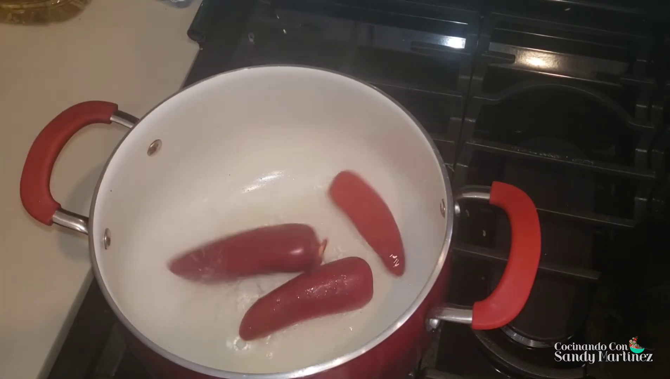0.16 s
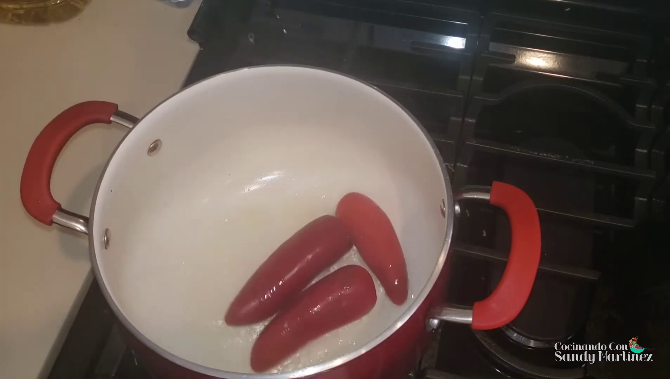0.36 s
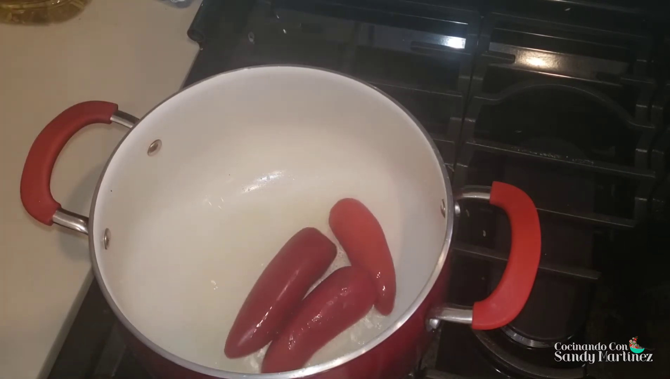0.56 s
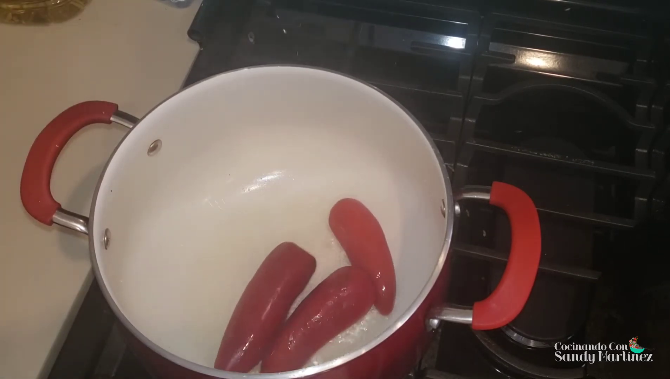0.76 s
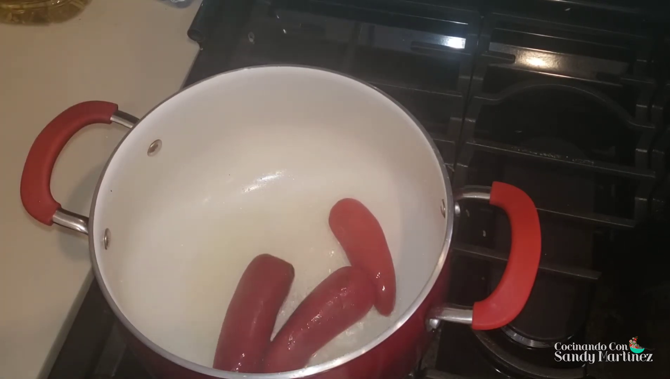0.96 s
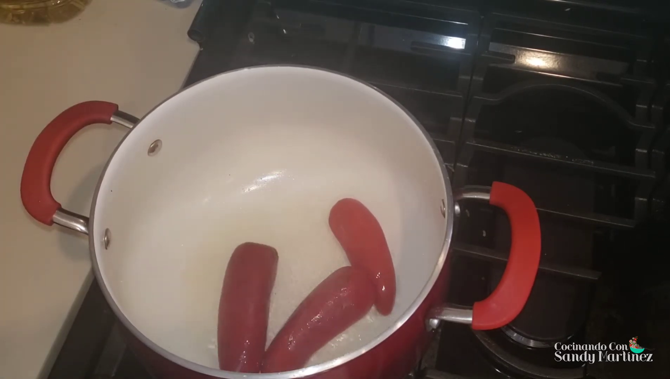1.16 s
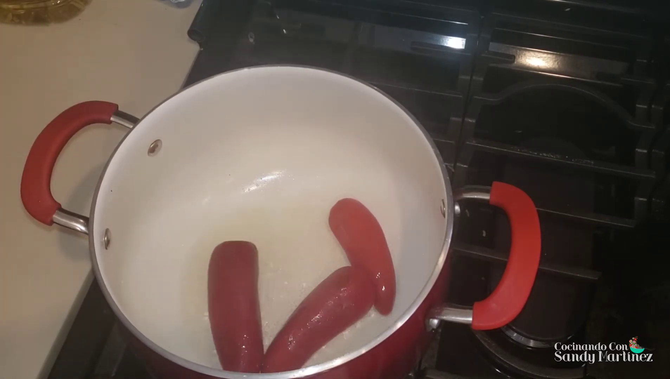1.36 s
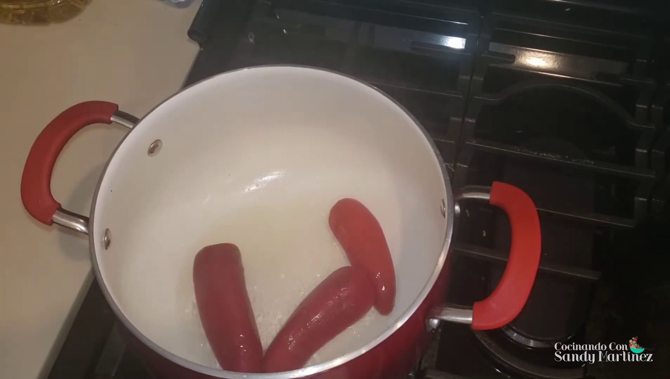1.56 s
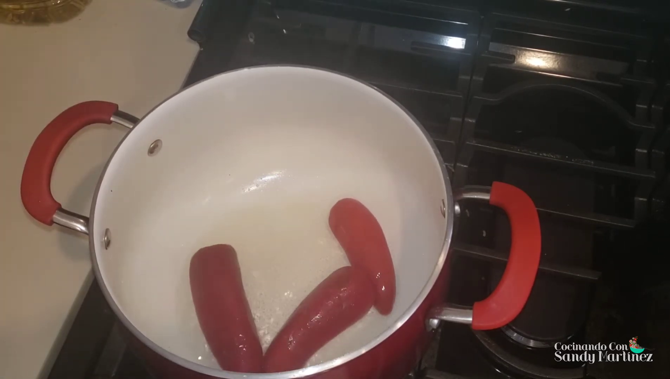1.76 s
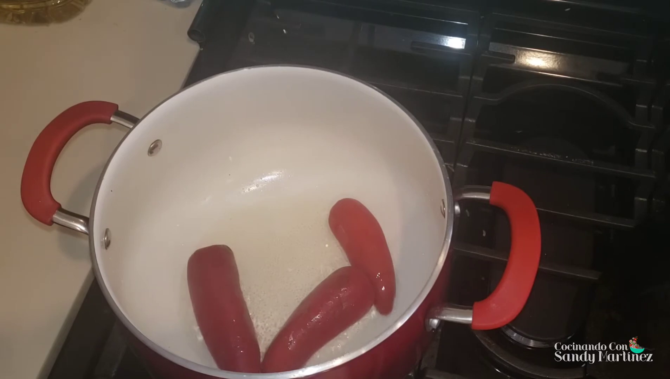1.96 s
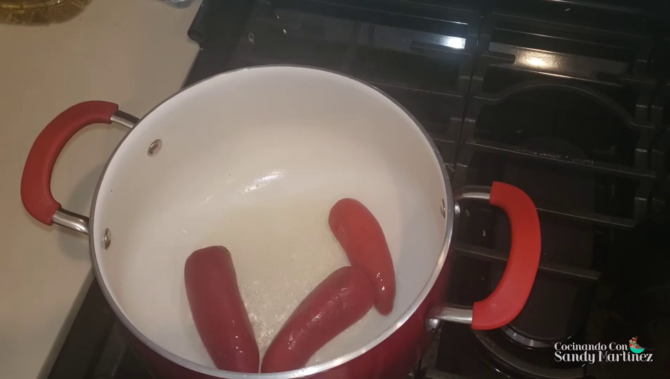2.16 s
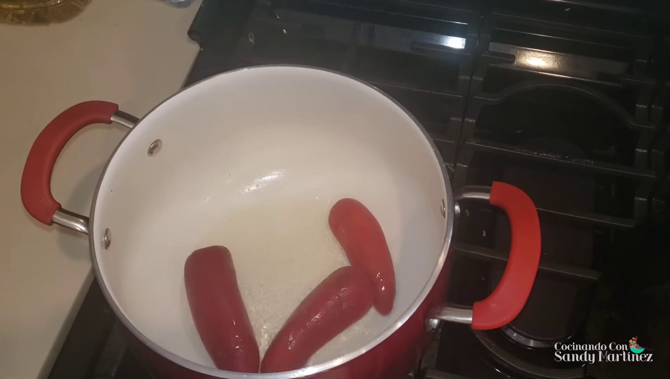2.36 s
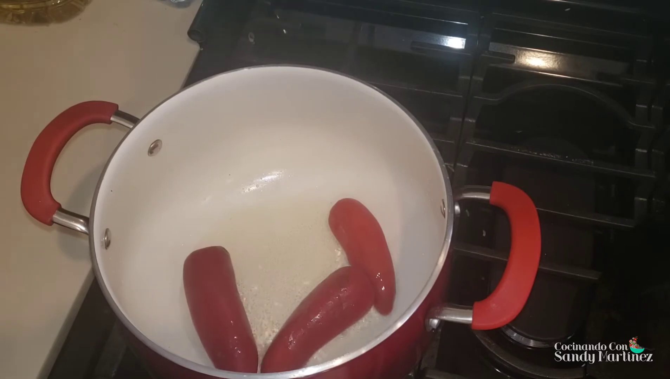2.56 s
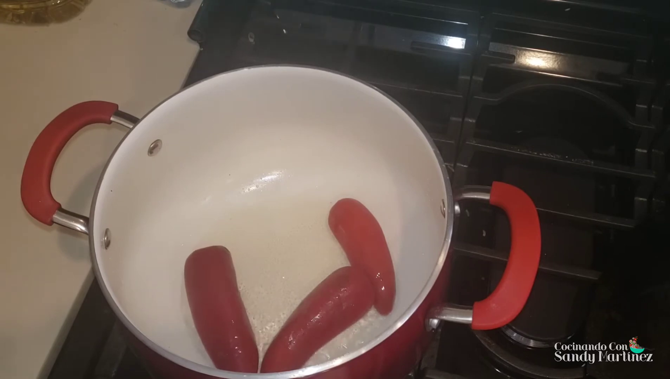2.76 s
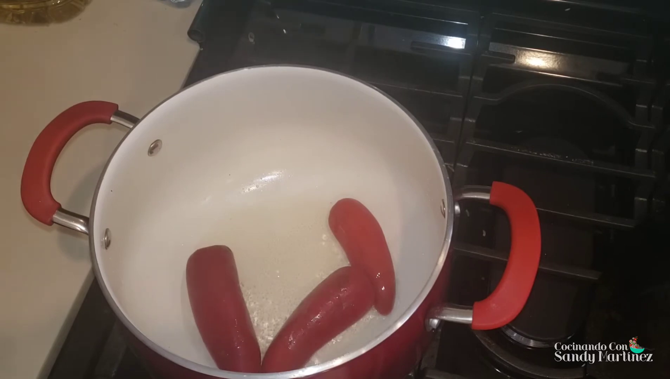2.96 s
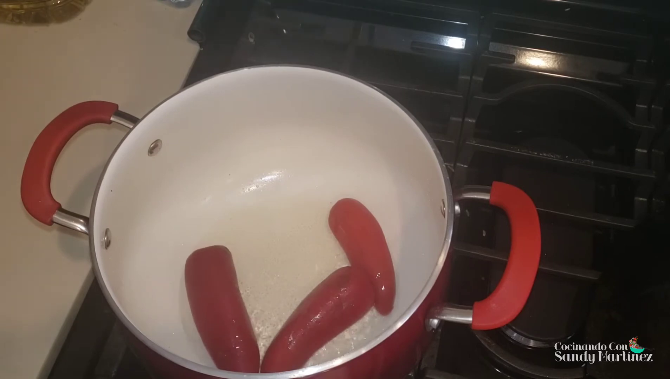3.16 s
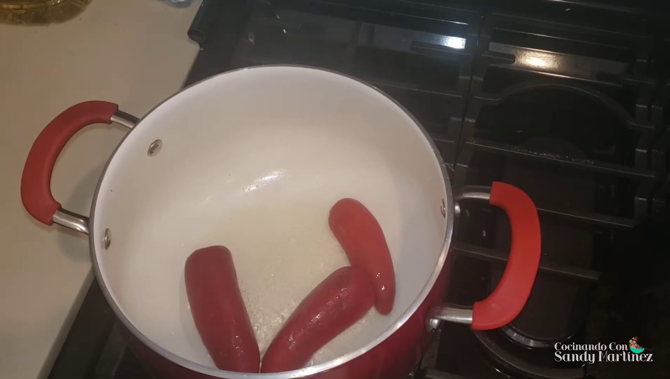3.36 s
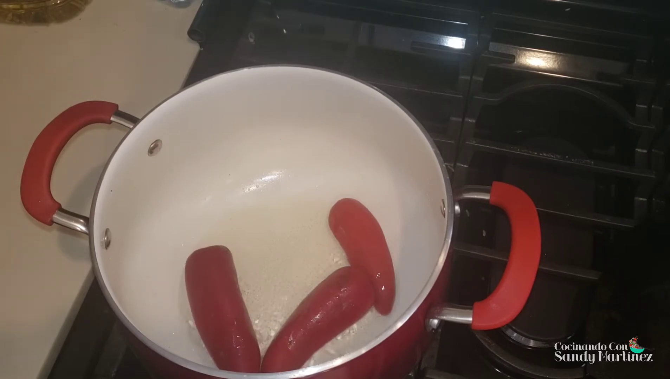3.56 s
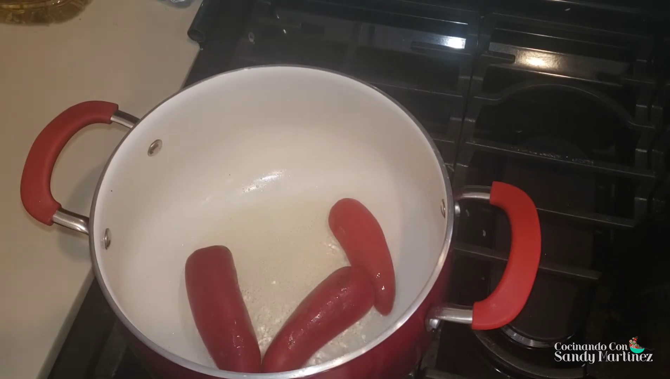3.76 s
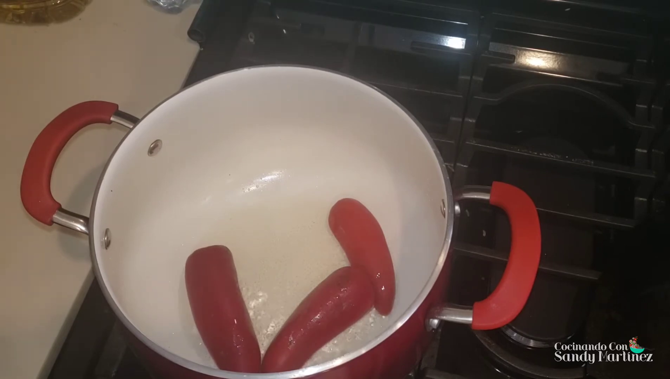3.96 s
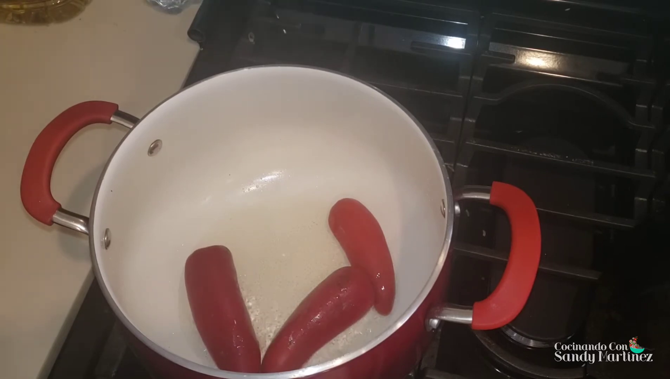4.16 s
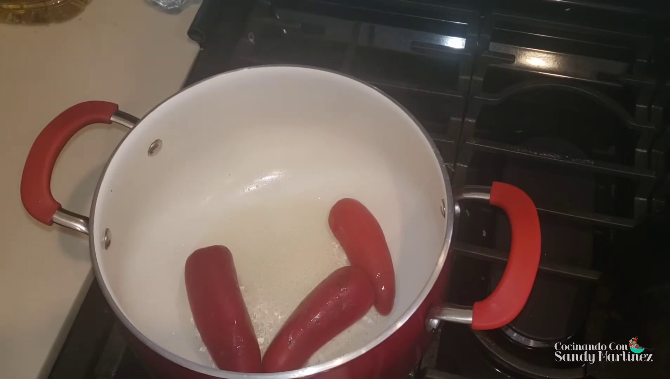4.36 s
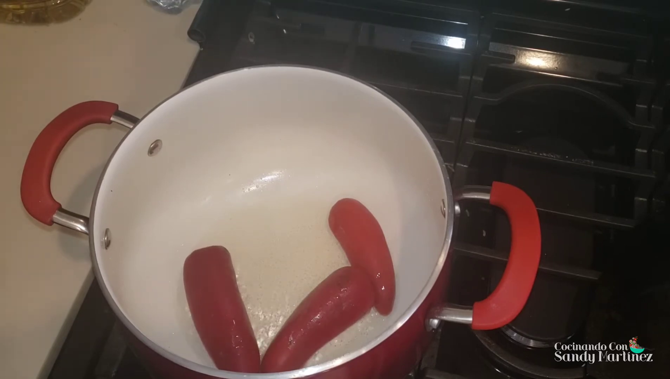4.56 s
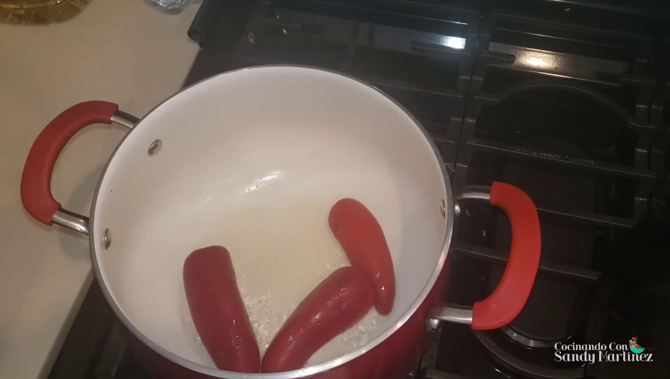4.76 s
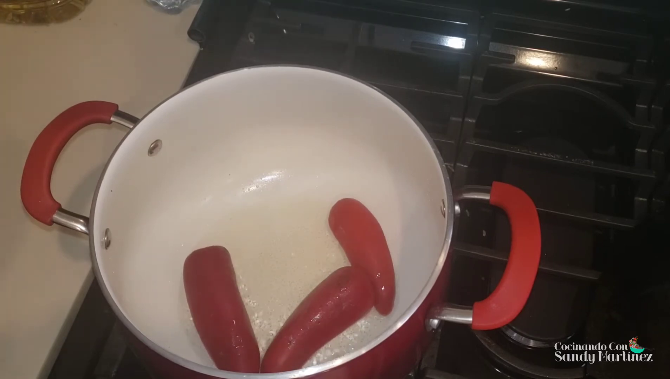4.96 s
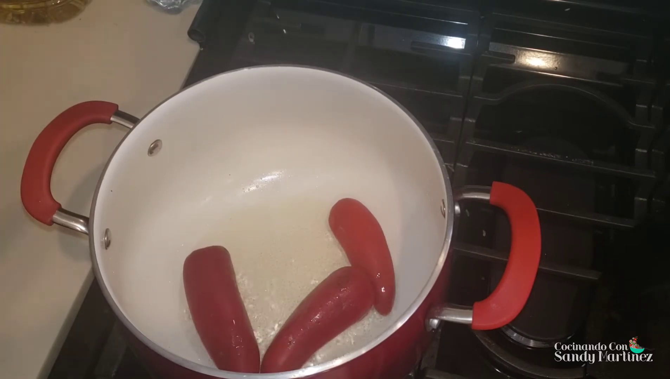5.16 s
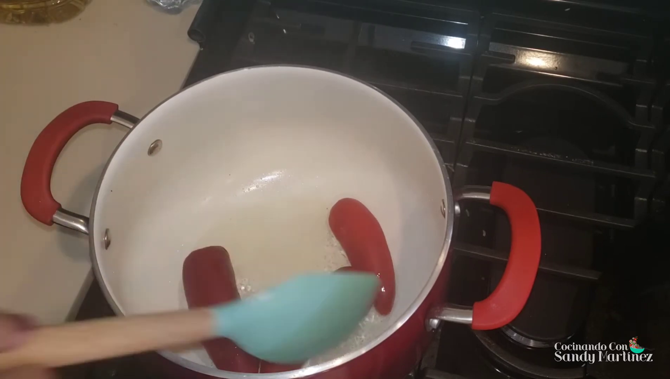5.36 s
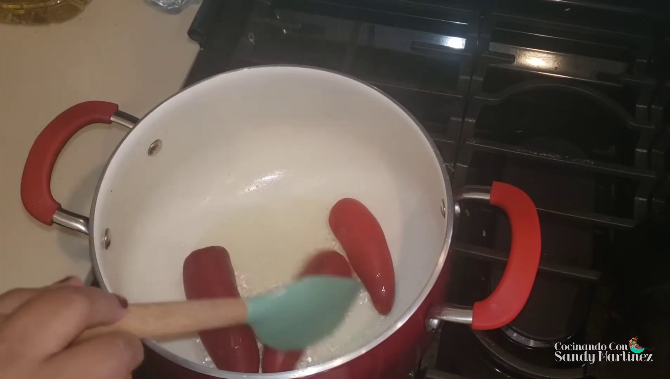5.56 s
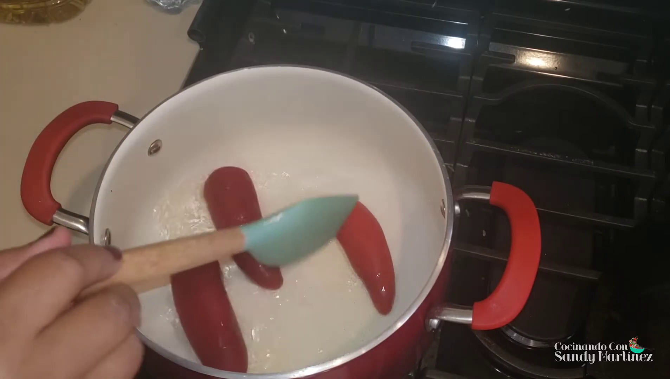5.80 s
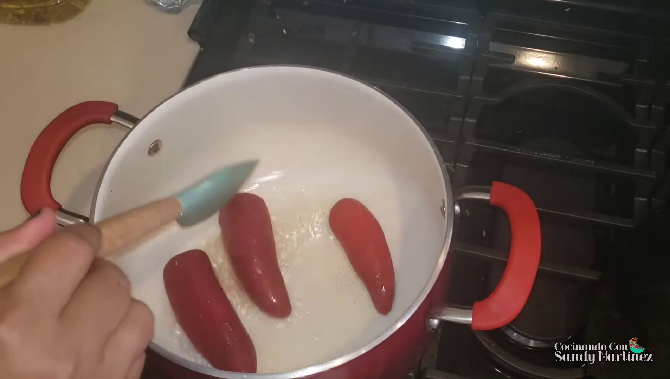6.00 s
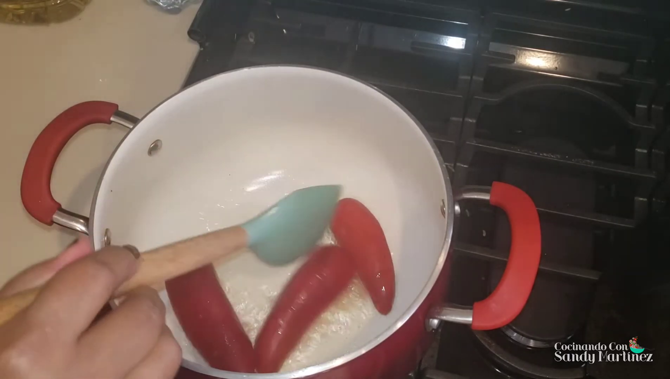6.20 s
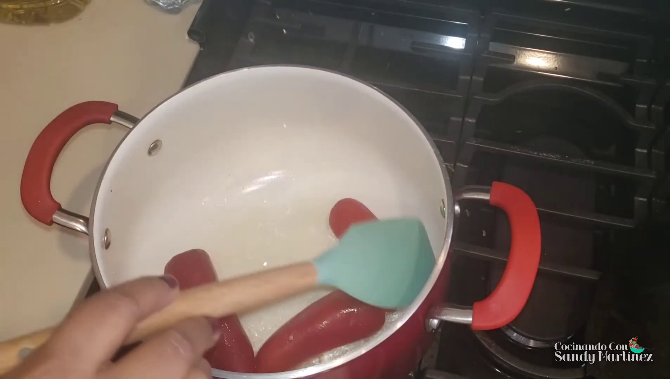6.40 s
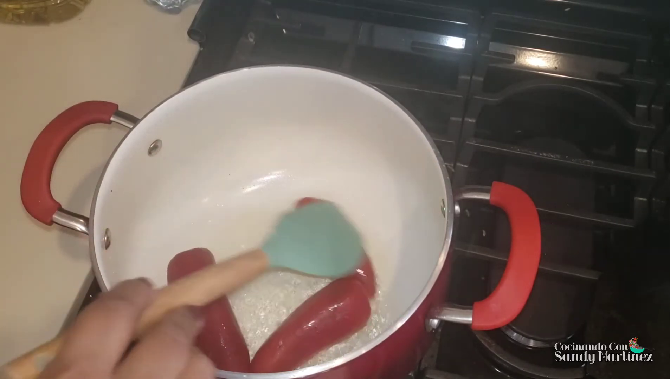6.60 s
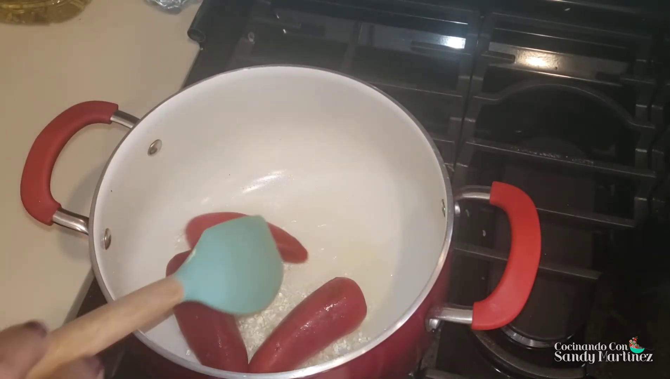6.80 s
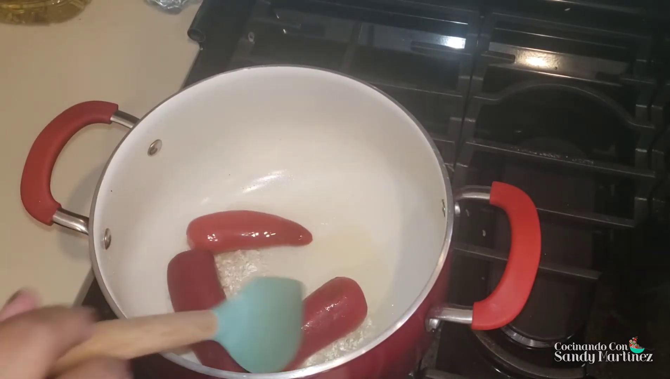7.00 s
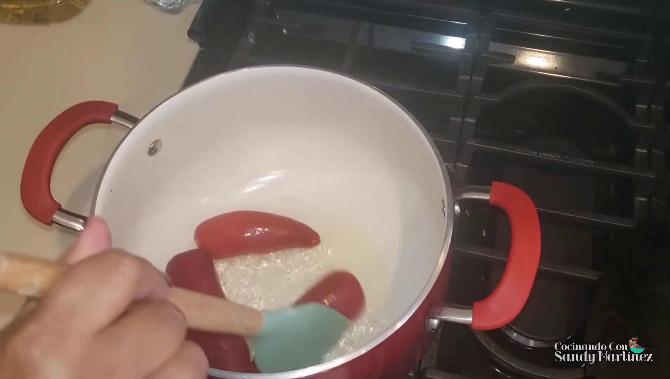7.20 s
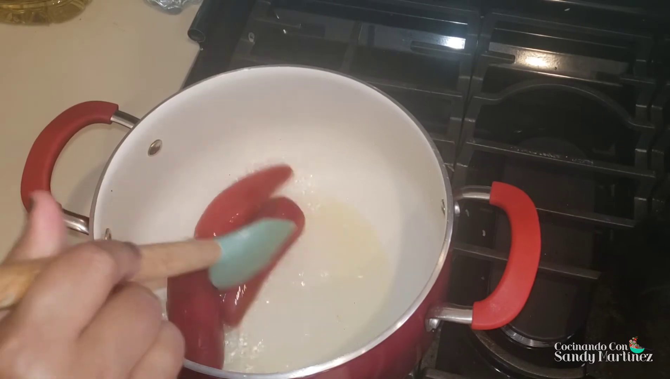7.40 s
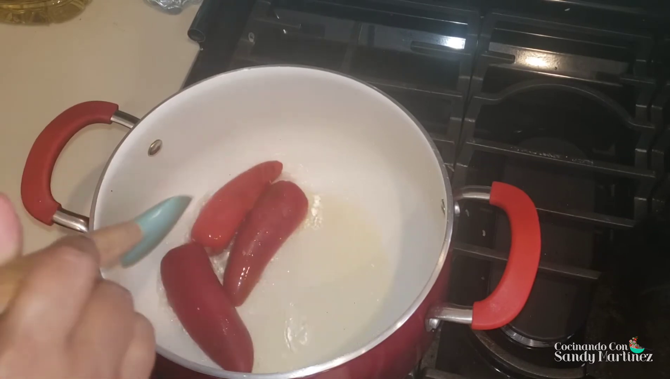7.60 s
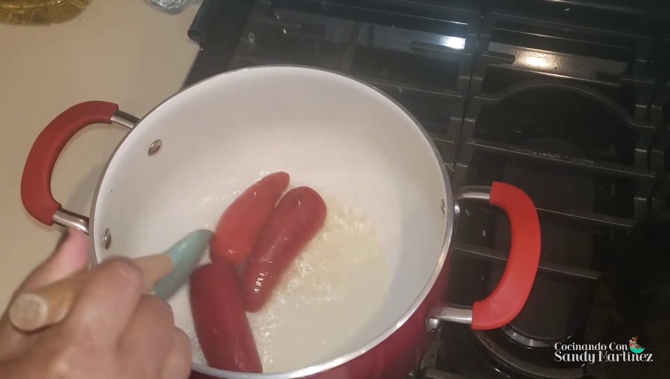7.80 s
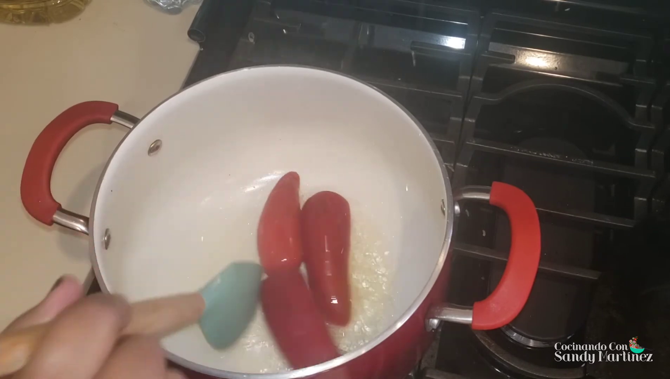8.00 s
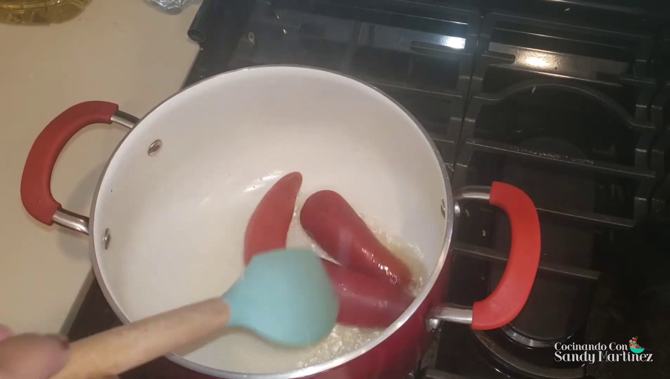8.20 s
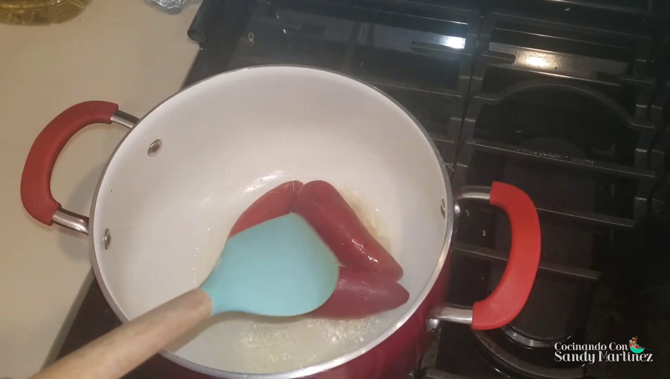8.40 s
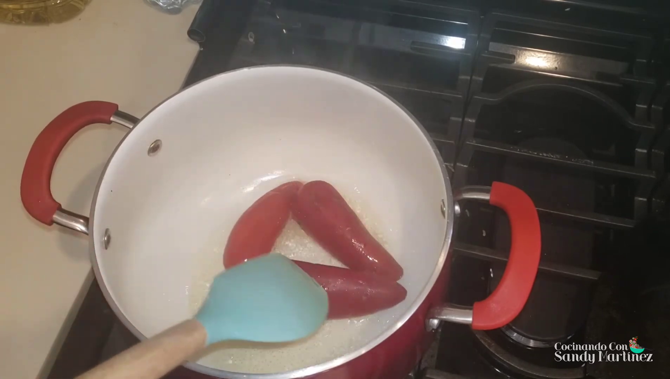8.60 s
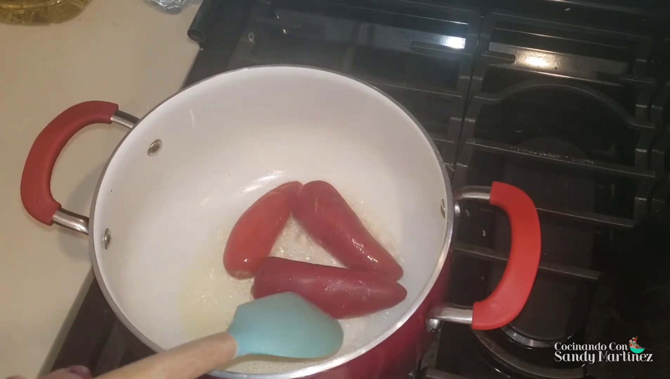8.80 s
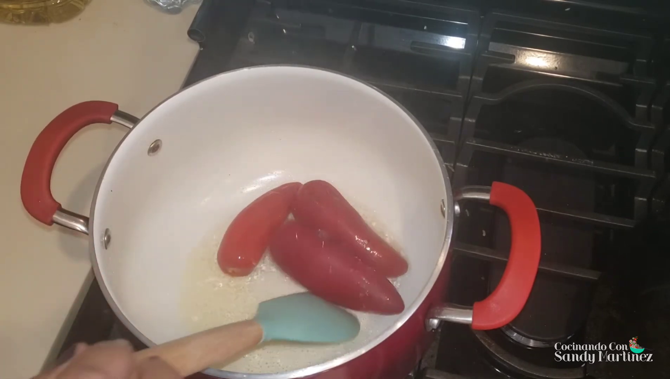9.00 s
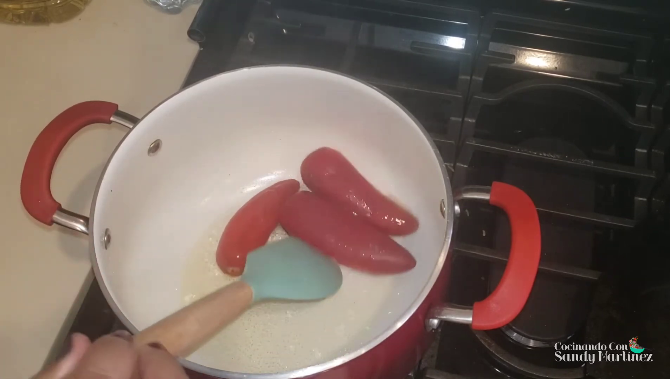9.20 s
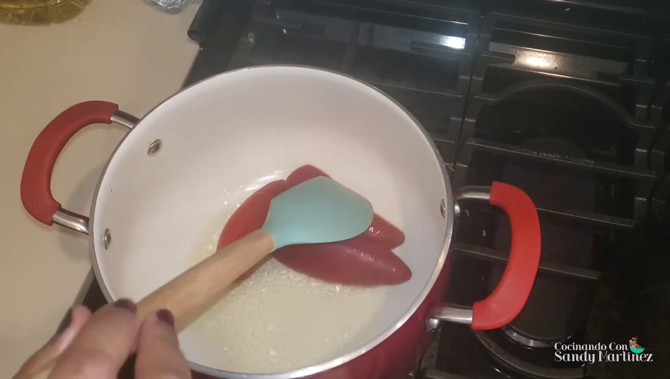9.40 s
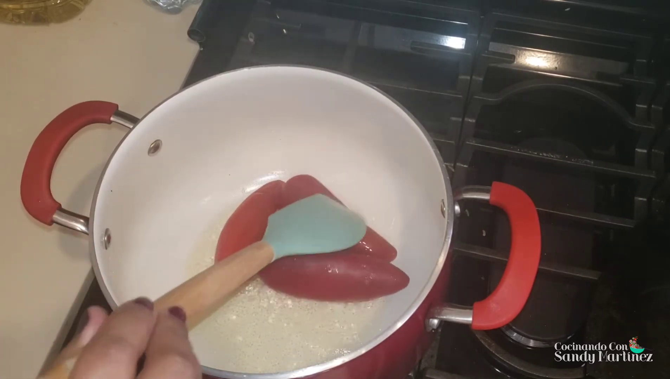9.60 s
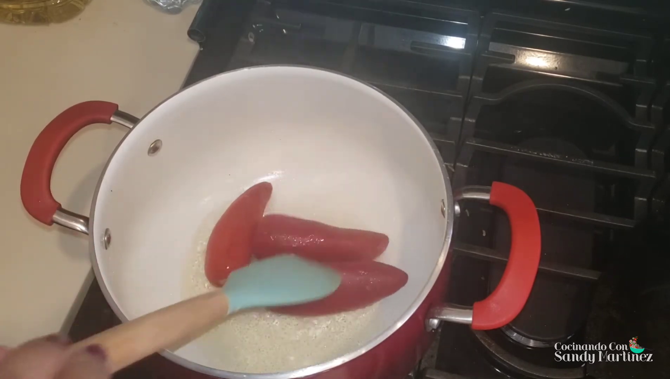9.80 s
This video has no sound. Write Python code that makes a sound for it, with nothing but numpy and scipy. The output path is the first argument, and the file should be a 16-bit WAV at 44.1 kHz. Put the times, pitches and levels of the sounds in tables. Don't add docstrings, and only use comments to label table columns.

```python
import sys
import numpy as np
from scipy import signal
from scipy.fft import rfft, irfft
from scipy.io import wavfile
from scipy.ndimage import uniform_filter1d

SR = 44100
rng = np.random.default_rng(int(sys.argv[2]) if len(sys.argv) > 2 else 0)


def persist_wave(psi):
    counts = np.round(np.clip(psi, -1, 1) * 32767).astype(np.int16)
    wavfile.write(sys.argv[1], SR, np.atleast_2d(counts).T)


def field_ratio(decibels):
    return 10 ** (np.asarray(decibels, dtype=float) / 20)


N = 434385
PLACES = 8

# start in seconds, peak in dB, pitch in Hz.
POPS_SETTLING = [(0.5129, -11.5, 2560), (0.598, -17, 3010), (0.83, -13, 3080), (0.8912, -15, 2750),
                 (0.987, -15, 2720), (1.088, -19, 2080), (1.158, -18, 3000), (1.2242, -9, 3600),
                 (1.248, -16, 2750), (1.5448, -13.5, 3020), (1.588, -22, 2740), (1.7306, -19, 2920),
                 (1.8, -31, 2660), (1.862, -17, 3520), (1.916, -18, 2800), (2.027, -21, 2380),
                 (2.1166, -11.5, 2960), (2.164, -7.5, 2660), (2.2669, -13.5, 2700), (2.386, -16, 2500),
                 (2.581, -14, 3230), (2.6048, -12.5, 3570), (2.749, -14, 3800)]
# start in seconds, peak in dB, pitch in Hz.
POPS_RESTING = [(2.851, -28, 1980), (2.9108, -17.5, 3480), (3.0037, -12.5, 3600), (3.0399, -9, 3700),
                (3.2056, -21.5, 2400), (3.4185, -10, 3200), (3.505, -13, 2830), (3.5297, -13, 2960),
                (3.6106, -11, 2940), (3.6886, -14, 2800), (3.8028, -28, 2120), (3.8445, -23, 3590),
                (3.8652, -11.5, 3840), (4.052, -13.5, 2680), (4.0953, -17, 1980), (4.1413, -12.5, 2720),
                (4.2288, -11, 3100), (4.394, -12, 2800), (4.5417, -16, 3710), (4.5997, -4, 3050),
                (4.6747, -12, 3300), (4.762, -16, 3500), (4.7904, -10.5, 3640), (5.1309, -8, 2780),
                (5.229, -23, 3550), (5.26, -14, 3000), (5.2805, -12.5, 2800), (5.591, -11, 3460)]
# start in seconds, peak in dB, pitch in Hz.
POPS_TURNED = [(5.689, -9.5, 4180), (5.8789, -2.5, 4300), (5.97, -11, 2800), (5.9923, -11.5, 3450),
               (6.047, -12, 3870), (6.1138, -11.5, 2330), (6.3348, -14, 3690), (6.355, -13, 4250),
               (6.4523, -10, 2700), (6.8474, -8.5, 2540), (7.0912, -11, 3870), (7.269, -7, 3930),
               (7.308, -10, 2680), (7.4026, -4, 3020), (7.477, -10, 3650), (7.504, -27, 2780),
               (7.7117, -8.5, 2780), (7.7503, -10, 2140), (7.85, -5, 2900), (7.901, -6.5, 2250),
               (8.011, -5, 2410), (8.0326, -10.5, 2340)]
# start in seconds, peak in dB, pitch in Hz.
POPS_PUSHED = [(8.2352, -10, 2340), (8.4168, -4, 3530), (8.617, -3.5, 2900), (8.6629, -11, 2800),
               (8.731, -12.5, 2160), (8.8895, -17, 4370), (9.079, -27, 2740), (9.122, -10, 2500),
               (9.2592, -15, 1760), (9.2941, -17, 3320), (9.3179, -8.5, 2120), (9.375, -15.5, 2170),
               (9.429, -16, 2420), (9.4544, -26, 2340), (9.4723, -8.5, 2340), (9.617, -20, 3600)]
RING_CYCLES = [1.74, 1.06, 1.3, 1.26]
RING_FALL, RING_HZ = 0.98, 2800
# start in seconds, peak in dB.
SNAPS_SETTLING = [(0.0534, -33), (0.069, -27), (0.0928, -19), (0.108, -16.5), (0.387, -13.5), (0.76, -17.5),
                  (0.8956, -15), (1.297, -15), (1.327, -18.5), (1.427, -14.5), (1.6384, -15.5),
                  (1.6712, -17), (1.8629, -18.5), (2.3724, -25), (2.4104, -19), (2.527, -23.5),
                  (2.6681, -19)]
# start in seconds, peak in dB.
SNAPS_RESTING = [(2.85, -11), (3.208, -22), (3.2514, -20.5), (3.4798, -12.5), (3.612, -19), (3.689, -10),
                 (3.804, -17), (4.0523, -22.5), (4.392, -18.5), (4.6332, -15), (4.91, -20.5), (5.1295, -24),
                 (5.281, -25.5)]
# start in seconds, peak in dB.
SNAPS_TURNED = [(5.809, -14), (5.9632, -8.5), (6.048, -10.5), (6.1173, -17), (6.2694, -16), (6.341, -18),
                (6.3995, -17), (6.719, -17), (7.161, -18.5), (7.21, -21), (7.353, -20), (7.477, -22),
                (7.519, -27)]
# start in seconds, peak in dB.
SNAPS_PUSHED = [(7.6885, -16), (7.8067, -19), (7.9547, -14), (7.9733, -11), (8.175, -18), (8.2176, -30),
                (8.2345, -14), (8.261, -13), (8.359, -15), (8.4163, -28), (8.4735, -20), (8.6162, -23),
                (8.754, -14), (9.2902, -24), (9.4668, -15.5), (9.5584, -32), (9.7167, -13), (9.792, -17)]
# start in seconds, peak in dB, pitch in Hz.
PLOPS = [(0.87, -31.5, 1150), (1.288, -32, 800), (2.05, -27.5, 940), (2.385, -29, 1240), (2.716, -28, 1200),
         (3.037, -32, 1150), (3.206, -25, 1142), (3.504, -22, 1250), (4.053, -19, 910),
         (4.228, -23.5, 1150), (4.298, -29.5, 856), (4.598, -28, 1520), (4.789, -26, 1150),
         (5.059, -27, 1370), (5.433, -29.5, 800), (5.317, -27, 1110), (5.33, -24, 1210),
         (5.513, -23.5, 920), (5.544, -18, 800), (7.357, -23, 1150), (7.852, -25.5, 1150),
         (7.887, -24, 1170), (7.943, -24.5, 1330), (9.375, -29, 1390), (9.838, -28, 636),
         (2.163, -27, 1490), (2.253, -33, 1150), (2.738, -32.5, 1120), (2.938, -30, 1130),
         (3.461, -34, 1150), (3.989, -38, 760), (4.324, -28.5, 1150), (4.575, -23, 1630)]
POP_SPATTER_DB, SNAP_SPATTER_DB = -41, -44
# start in seconds, peak in dB, pitch in Hz.
BLIPS_LEFT_ALONE = [(0.1786, -1, 5100), (0.237, -8.0, 4330), (0.3046, -7, 4890), (0.3221, -0.5, 4250),
                    (0.3307, -8, 2900), (0.4178, -7, 4300), (0.607, -10, 2930), (0.7799, -9.5, 2800),
                    (0.8365, -6, 4070), (0.8987, -9.5, 2800), (0.9087, -17, 2760), (0.9364, -11, 2800),
                    (1.026, -15.5, 2780), (1.0516, -25, 3070), (1.1188, -7, 3500), (1.346, -13, 4620),
                    (1.42, -10, 3750), (1.4765, -10.5, 3220), (1.5572, -13.5, 2620), (1.6029, -12, 2670),
                    (1.6474, -20, 5110), (1.7432, -22, 5190), (1.7751, -18, 5230), (1.7991, -12, 2540),
                    (2.0621, -13, 2100), (2.305, -10, 5330), (2.6202, -18.5, 1930), (2.7171, -13, 3170),
                    (2.7407, -15, 2720), (2.7488, -16, 3050), (2.8777, -17.0, 4740), (3.3433, -4.5, 4500),
                    (3.4625, -19, 2780), (3.664, -10.5, 2800), (3.7027, -12, 4340), (3.881, -15, 4760),
                    (3.8888, -10, 5340), (4.398, -7, 4210), (4.4039, -17, 2830), (4.4436, -9, 3600),
                    (4.576, -16.5, 2000), (4.6208, -27, 2800), (4.9387, -8, 6200), (4.9851, -11, 4540),
                    (5.0749, -5, 7000), (5.3049, -12, 5500), (5.3353, -19, 6300), (5.4561, -5, 5760),
                    (5.1374, -8, 4300), (5.147, -7, 3500), (5.2987, -14, 2883), (5.3846, -15, 4360),
                    (5.4313, -13, 3530), (5.4697, -6, 4800), (5.5795, -23, 3450)]
# start in seconds, peak in dB, pitch in Hz.
BLIPS_STIRRED = [(5.6899, -9, 4350), (5.7052, -14, 2840), (5.84, -8, 2900), (5.8455, -7, 2380),
                 (5.85, -6.5, 3430), (5.863, 0, 4950), (6.1402, -3.5, 3220), (6.1854, -20, 4070),
                 (6.2842, -2, 4590), (6.335, -11.0, 3800), (6.3799, -10, 3750), (6.6407, -2, 4350),
                 (6.7495, -9.5, 2590), (6.7682, -3.5, 4560), (6.813, -5.5, 2920), (6.8755, -10.5, 2120),
                 (6.8836, -12.5, 2660), (7.1188, -11, 2900), (7.348, -10.5, 2880), (7.3522, -16.5, 1790),
                 (7.503, -8, 2800), (7.5598, -14, 4910), (7.5752, -7, 2770), (7.598, -15, 3630),
                 (7.6145, -9, 2780), (7.6556, -1.5, 4250), (7.7229, -9, 2660), (7.7415, -4, 3530),
                 (7.7666, -4, 3570), (7.7833, -5, 3230), (7.811, -17, 5450), (7.8685, -1.5, 2800),
                 (7.932, -3, 3660), (8.2071, -19, 1980), (8.3353, -18, 2170), (8.37, -10.5, 2040),
                 (8.5507, -10.5, 2016), (8.558, -9.0, 3010), (8.6664, -9, 2720), (8.6816, -6.5, 2650),
                 (8.8366, -7, 2750), (8.8902, -4.5, 4190), (8.904, -7, 4380), (8.9463, -9.5, 2700),
                 (8.9776, -7.5, 2400), (9.0488, -16, 3350), (9.0839, -10, 2830), (9.544, -12, 4030),
                 (9.6191, -7.5, 3640), (9.74, -12.5, 2370)]
# start in seconds, peak in dB.
TICKS_LEFT_ALONE = [(0.186, -7), (0.363, -6), (0.4668, -20), (0.6043, -6.5), (0.739, -11), (0.9376, -9),
                    (1.3475, -13), (1.5868, -11), (1.6853, -11), (1.7752, -10.5), (1.9164, -11),
                    (1.9343, -15), (2.0278, -10), (2.3065, -19), (2.7409, -14.5), (2.8767, -6),
                    (3.484, -17), (3.619, -13), (3.6299, -3.5), (4.3653, -15), (4.4046, -11), (4.6216, -25),
                    (4.6311, -3.5), (5.051, -24), (5.1585, -24), (5.1929, -13), (5.497, -20)]
# start in seconds, peak in dB.
TICKS_STIRRED = [(5.774, -7), (5.8655, -4), (5.8897, -13), (5.9165, -2), (5.9284, -5), (5.9865, -7),
                 (6.062, -10), (6.089, -12), (6.0973, -11), (6.117, -15), (6.1287, -16), (6.1427, -9),
                 (6.1559, -8), (6.166, -11), (6.1854, -9), (6.2134, -10), (6.2253, -5), (6.236, -9),
                 (6.3555, -5), (6.4283, -10), (6.4424, -20), (6.5765, -11), (6.7645, -4), (6.7756, -9),
                 (6.784, -3), (6.8124, -6), (6.9478, -12), (7.029, -9), (7.043, -15), (7.2691, -3),
                 (7.4767, -15), (7.524, -17), (7.542, -5), (7.634, -9), (7.7668, -10), (7.806, -8),
                 (7.9813, -17), (7.9941, -4), (8.0142, -4), (8.063, -2), (8.0714, -6), (8.0932, -13),
                 (8.1942, -12), (8.218, -10), (8.235, -7), (8.378, -6), (8.4744, -23), (8.676, -5),
                 (8.903, -15.0), (9.058, -10), (9.124, -6), (9.264, -13), (9.2949, -10), (9.3076, -6),
                 (9.482, -13), (9.489, -6), (9.5585, -10), (9.6331, -13), (9.773, -5), (9.7943, -9)]
# time in seconds, level in dB.
VIGOUR = [(0.0, -41.5), (0.155, -50), (0.17, -29), (0.38, -32.5), (0.6, -36.5), (2.4, -39.5), (3.15, -43),
          (5.683, -40.5), (5.69, -36), (5.86, -28), (5.96, -31.5), (7.1, -36.5), (7.47, -35.5), (7.53, -32),
          (7.85, -31), (8.97, -33), (9.25, -38.5), (9.85, -30.5)]
USUAL_DB = -35
# time in seconds, level in dB.
POCKETS = [
    (0.4, -81),
    (.8, -20.5),
    (1.3, -25.5),
    (1.8, -37.5),
    (7.4, -41.5),
    (9.05, -24.5),
    (9.3, -40),
]
# start in seconds, extra spray in dB, extra churn in dB.
WETTINGS = [
    (0.0, 7.5, 7.5),
    (0.252, 4, -4.5),
    (1.999, 2, 3),
    (3.501, 3.5, 8),
    (5.69, 1.5, 13.5),
    (6.499, -0.5, 8.5),
    (7.499, 5, 7.5),
    (8.1, 1, 1.5),
    (8.9, -1, -15),
]
FLARE_S = 0.47
SPRAY_DB, SPRAY_FOLLOWS = -41, 1.135
CHURN_DB, CHURN_FOLLOWS = -51, 0.18
# frequency in Hz, level in dB.
SPRAY = [(300, -59), (1500, -20), (4000, 4), (8000, 5), (11000, 5.5), (13500, 11), (15500, 5.5)]
# frequency in Hz, level in dB.
CHURN = [(100, -7), (250, -4.5), (600, 9.5), (1200, 13), (1800, 20), (3000, 18), (6000, -69.5)]
# frequency in Hz, width in Hz, level in dB.
POT = [(580, 160, 3), (800, 86, -7), (1150, 71, -6.5), (1980, 52, -14), (2340, 18, -34.5), (2780, 74, -11),
       (3480, 32, -13.5)]
# start in seconds, peak in dB, pitch in Hz.
BUMPS = [
    (6.171, -30.5, 60.4),
    (6.707, -32, 185),
    (7.829, -48, 125),
    (7.989, -45, 43.1),
    (8.142, -36.5, 52.5),
    (8.171, -38, 43.3),
    (8.372, -41, 72.9),
    (8.76, -36.5, 55.6),
    (9.47, -42, 62.4),
    (9.798, -47, 64),
]
# start in seconds, peak in dB, length in seconds, pitch in Hz.
SCRAPES = [
    (0.203, -48, 0.26, 172),
    (6.423, -25.5, 0.011, 365),
    (6.426, -31, 0.05, 194),
    (6.703, -30.5, 0.04, 207),
    (6.736, -36.5, 0.062, 241),
    (3.048, -47, 0.055, 300),
    (8.131, -34.5, 0.012, 145.5),
]
# frequency in Hz, time to fall by 60 dB in seconds.
KITCHEN = [(200, 0.062), (1000, 0.8), (3000, 0.11), (8000, 0.16), (15000, 0.038)]
KITCHEN_DB = -16
# time in seconds, firing rate in Hz, level in dB.
DRONE = [
    [(0.0, 87.4, -59.5), (0.98, 110, -56), (1.45, 105.3, -64)],
    [(1.9, 82.2, -67), (2.34, 81.4, -57), (2.91, 63.6, -46), (3.59, 75.3, -55.5), (4.15, 80.8, -38),
     (4.55, 89.2, -34), (4.69, 93.2, -43), (4.85, 96.2, -42.5), (5.1, 101, -52), (5.6, 91.5, -62)],
    [(4.88, 105.6, -44), (5.04, 119.2, -42), (5.2, 110.3, -51), (5.5, 104.3, -56)],
    [(5.7, 77.5, -54), (5.904, 74.3, -46), (6.15, 75.7, -53)],
    [(6.2, 127.4, -51), (6.5, 112.6, -53), (8.05, 136, -56.5), (8.72, 137.8, -59.5)],
    [(8.95, 69, -64), (9.258, 68, -46), (9.85, 73, -55)],
]
STRAIN_DB = [2, -2.5, -3.5, 1, -4, -14]
OVERTONES_DB = [-15.5, -22.5, -29]
# frequency in Hz, level in dB.
RUMBLE = [(22, -30), (87, 0.5), (162, -16), (222, -13.5), (336, -21), (400, -12), (520, -40), (880, -120)]
RUMBLE_DB = -52.5
# frequency in Hz, level in dB.
LEFT = [(60, -3), (700, -6.5), (2400, -5.5), (4400, -5.5), (6500, -7), (9200, -28.5), (11500, -12.5),
        (15000, -22.5)]
DROPOUT_S = (4.8975, 4.9035)
DROPOUT_DB, EDGE_HZ = -35, 15900


def evened(x):
    return x / np.sqrt(np.mean(x ** 2) + 1e-20)


def read(points, hz):
    f, value = np.transpose(points)
    return np.interp(np.log(hz + 1), np.log(f + 1), value)


def follow(points):
    return np.interp(np.arange(N) / SR, *np.transpose(points))


def add(mix, s, sound):
    part = mix[round(s * SR):][:len(sound)]
    part += sound[:len(part)]


def colour(points, size=1024):
    gain = np.log(field_ratio(read(points, abs(np.fft.fftfreq(4 * size, 1 / SR)))))
    phase = -signal.hilbert(gain).imag
    taps = np.fft.ifft(np.exp(gain + 1j * phase)).real[:size]
    return taps / np.linalg.norm(taps)


def bubble(hz, cycles, glide=0.056, rise=1.0):
    u = np.arange(500) * hz / SR
    tone = np.sin(2 * np.pi * u * (1 + glide * u))
    shape = tone * np.exp(-u / cycles) * (1 - np.exp(-u / rise))
    return shape / abs(shape).max()


def spattered(sound, grit, db, t60):
    train = field_ratio(db - 60 * np.arange(len(grit)) / SR / t60) * grit ** 3
    train[0] = 1
    return signal.oaconvolve(train, sound)


def pops():
    out = np.zeros((PLACES, N))
    snap, plop = colour(SPRAY, size=500), colour(CHURN, size=500)
    stages = zip([POPS_SETTLING, POPS_RESTING, POPS_TURNED, POPS_PUSHED], RING_CYCLES)
    large = [(s, db, hz, ring * (RING_HZ / hz) ** RING_FALL) for rows, ring in stages for s, db, hz in rows]
    drops = SNAPS_SETTLING + SNAPS_RESTING + SNAPS_TURNED + SNAPS_PUSHED
    for k, (s, db, hz, cycles) in enumerate(large):
        burst = bubble(hz, max(cycles, 0.4), glide=0.0013) + field_ratio(8.5) * snap / cycles + plop
        burst = spattered(burst, rng.standard_normal(3000), POP_SPATTER_DB, 0.096)
        add(out[k % PLACES], s, field_ratio(db - 2.5) * burst)
    for k, (s, db) in enumerate(drops):
        burst = snap + field_ratio(-19) * plop
        burst = spattered(burst, rng.standard_normal(3000), SNAP_SPATTER_DB, 0.18)
        add(out[(k + 3) % PLACES], s, field_ratio(db + 19) * burst)
    for k, (s, db, hz) in enumerate(PLOPS):
        burst = bubble(hz, 1.0, rise=0.56) + field_ratio(15) * plop
        burst = spattered(burst, rng.standard_normal(3000), -33, 0.086)
        add(out[k % PLACES], s, field_ratio(db - 5) * burst)
    return out


def small_bursts():
    out, snap = np.zeros((PLACES, N)), colour(SPRAY, size=300)
    for k, (s, db, hz) in enumerate(BLIPS_LEFT_ALONE + BLIPS_STIRRED):
        burst = bubble(hz, 1.4 * (RING_HZ / hz) ** RING_FALL, glide=0.004, rise=0.9)
        burst = spattered(burst, rng.standard_normal(1200), -34, 0.044)
        add(out[k % PLACES], s, field_ratio(db - 8.5) * burst)
    for k, (s, db) in enumerate(TICKS_LEFT_ALONE + TICKS_STIRRED):
        burst = spattered(snap, rng.standard_normal(1200), -43.5, 0.1)
        add(out[(k + 5) % PLACES], s, field_ratio(db + 9.5) * burst)
    return out


def flaring(column, base_db, follows):
    t = np.arange(N) / SR
    flare_db = sum(row[column] * (t >= row[0]) * np.exp(-abs(t - row[0]) / FLARE_S) for row in WETTINGS)
    return field_ratio(base_db + follows * (follow(VIGOUR) - USUAL_DB) + flare_db)


def clicks(level, per_s, spread_db, flurry, busy, fade_s=0.0073):
    step = 16
    slots = N // step + 1
    start, strength = rng.random((2, slots))
    flurries_per_s = 25
    kicks = (start < flurries_per_s * step / SR) * np.minimum(-np.log(strength), 1.5)
    surge = 1 + flurry * signal.lfilter([1], [1, -np.exp(-step / SR / fade_s)], kicks)
    crowd = evened(level) ** busy
    rate = per_s / PLACES / SR * step * np.append(crowd[::step], 0)[:slots]
    chance, size, shift = rng.random((3, PLACES, slots))
    place, slot = np.nonzero(chance < rate)
    sizes = field_ratio(spread_db * np.minimum(-np.log(size[place, slot]), 2.6))
    out = np.zeros((PLACES, N + step))
    out[place, step * slot + (step * shift[place, slot]).astype(int)] = surge[slot] * sizes
    return evened(out[:, :N] / np.sqrt(crowd)) * level


def boiling():
    level = field_ratio(follow(VIGOUR))
    quick_hz = np.geomspace(2500, 6500, PLACES)
    pocket_hz = np.resize([2120, 2660, 2830, 3600, 4250, 3050, 1993, 3800], PLACES)
    quick = np.array([bubble(hz, 1.08) * field_ratio(-4 * abs(np.log2(hz / 3300))) for hz in quick_hz])
    pockets = np.array([bubble(hz, 5.0, glide=0.003, rise=1.5) for hz in pocket_hz])
    fizz = clicks(level, per_s=1800, spread_db=3.5, flurry=1.82, busy=0.7, fade_s=0.011)
    singing = clicks(level, per_s=200, spread_db=2.0, flurry=0.13, busy=0.22) * field_ratio(follow(POCKETS))
    out = field_ratio(-16.5) * signal.oaconvolve(fizz, quick, axes=1)
    return (out + signal.oaconvolve(singing, pockets, axes=1))[:, :N]


def spray():
    level = flaring(1, SPRAY_DB, SPRAY_FOLLOWS)
    tilts_db = np.linspace(-4, 5, PLACES)
    tones = [[(hz, db + tilt * np.log2(hz / 10000)) for hz, db in SPRAY] for tilt in tilts_db]
    drops = np.array([colour(tone, size=256) for tone in tones])
    mist = clicks(level, per_s=7000, spread_db=5.0, flurry=1.6, busy=0.5)
    ticks = clicks(level, per_s=76, spread_db=5.5, flurry=0.39, busy=0.8) * evened(level) ** 0.38
    return signal.oaconvolve(field_ratio(-1) * mist + field_ratio(-6.5) * ticks, drops, axes=1)[:, :N]


def churn():
    level = flaring(2, CHURN_DB, CHURN_FOLLOWS)
    train = clicks(level, per_s=490, spread_db=7.5, flurry=0.26, busy=0.62)
    return field_ratio(-8) * signal.oaconvolve(train, colour(CHURN)[None], axes=1)[:, :N]


def pot(places):
    t = np.arange(4000) / SR
    ring = sum(field_ratio(db) * np.exp(-np.pi * w * t) * np.sin(2 * np.pi * hz * t) for hz, w, db in POT)
    paths = np.zeros((2, PLACES, 240))
    at = rng.integers(10, 240, (2, PLACES, 7))
    np.put_along_axis(paths, at, field_ratio(-7 - 0.07 * at) * rng.choice([-1., 1.], at.shape), 2)
    paths[0, np.arange(PLACES), np.arange(PLACES) * 3 % 8] = 1
    paths[1, :, 4] = 1
    near = signal.oaconvolve(places[None], paths, axes=2)[..., :N].sum(1)
    return near + field_ratio(-31.5) * signal.oaconvolve(places.sum(0), ring)[:N]


def spatula():
    push, rub, t = np.zeros(N), np.zeros(N), np.arange(8000) / SR
    for s, db, hz in BUMPS:
        u = t * hz
        thud = np.sin(2 * np.pi * u) * np.exp(-u / 0.4) * (1 - np.exp(-u / 0.027))
        add(push, s - 0.004, field_ratio(db + 13) * thud)
    for s, db, length, hz in SCRAPES:
        grit = rng.standard_normal(8000)
        stroke = (1 - np.exp(-t / 0.011)) * np.exp(-(t / length) ** 1.37)
        low = signal.lfilter(*signal.iirpeak(hz, 1.6, SR), grit)
        wall = signal.lfilter(*signal.iirpeak(740, 9.0, SR), grit)
        add(rub, s - 0.005, field_ratio(db + 2.5) * stroke * (evened(low) + 0.72 * evened(wall)))
    return push * field_ratio([[-4], [3]]) + rub


def kitchen(x):
    taps = np.zeros((2, SR // 2))
    at = np.arange(200, SR // 2 - 20, 20) + rng.integers(0, 20, (2, (SR // 2 - 201) // 20))
    np.put_along_axis(taps, at, rng.choice([-1., 1.], at.shape), 1)
    hz, t, z = signal.stft(taps, SR, nperseg=256)
    fade = field_ratio(-60 * t / read(KITCHEN, hz)[:, None])
    tail = signal.istft(z * fade, SR, nperseg=256)[1]
    return signal.oaconvolve(x[None], tail / np.linalg.norm(tail[0]), axes=1)[:, :N]


def slow_noise(size):
    noise = rng.standard_normal(size)
    return evened(uniform_filter1d(uniform_filter1d(noise, 2500), 2500))


def drone():
    out = np.zeros(N)
    for rows, strain_db in zip(DRONE, STRAIN_DB):
        s, hz, db = np.transpose(rows)
        t = np.arange(s[0], s[-1], 1 / SR)
        waver, wobble = slow_noise(len(t)), slow_noise(len(t))
        turns = np.cumsum(np.interp(t, s, hz) * (1 + 0.005 * wobble)) / SR
        tone = field_ratio(2.5 * waver) * np.sin(2 * np.pi * turns)
        for k, under_db in enumerate(OVERTONES_DB):
            rough_db = 5.4 * np.roll(wobble, 9000 * k)
            tone += field_ratio(under_db + strain_db + rough_db) * np.sin(2 * np.pi * (k + 2) * turns)
        fade = signal.windows.tukey(len(t), 0.05)
        add(out, s[0], np.sqrt(2) * field_ratio(np.interp(t, s, db)) * tone * fade)
    return out


def rumble():
    a, b = rng.standard_normal((2, N))
    shape = field_ratio(read(RUMBLE, np.fft.rfftfreq(N, 1 / SR)))
    rows = np.concatenate(DRONE[:2] + DRONE[3:])
    swell = field_ratio(0.45 * (follow(rows[:, [0, 2]]) + 48))
    ports = irfft(rfft([0.75 * a + 0.8 * b, a - 0.8 * b]) * shape, N)
    return field_ratio(RUMBLE_DB - 3) * swell * evened(ports)


def scene():
    oil = pot(pops() + small_bursts() + boiling() + spray() + churn())
    outside = drone() * field_ratio([[-0.6], [0.6]]) + rumble()
    return oil + spatula() + field_ratio(KITCHEN_DB) * kitchen(oil[1]) + outside


def low_pass(x):
    return signal.sosfilt(signal.butter(12, 16800, fs=SR, output="sos"), x)


def record(dry):
    shade = colour(LEFT)
    left = signal.oaconvolve(dry[0], field_ratio(1.2) * shade / shade.sum())[:N]
    ports = signal.lfilter(*signal.butter(1, 42, "high", fs=SR), np.array([left, dry[1]]))
    ports = np.clip(ports, -1, 1)
    corners_s = np.repeat(DROPOUT_S, 2) + [-0.002, 0, 0, 0.001]
    gap_db = np.interp(np.arange(N) / SR, corners_s, [0, DROPOUT_DB, DROPOUT_DB, 0])
    edge = signal.firwin(255, EDGE_HZ, window=("kaiser", 7), fs=SR)
    mix = signal.oaconvolve(ports * field_ratio(gap_db), edge[None], "same")
    return low_pass(mix)


dry = scene()
out = record(dry)
persist_wave(out)
```